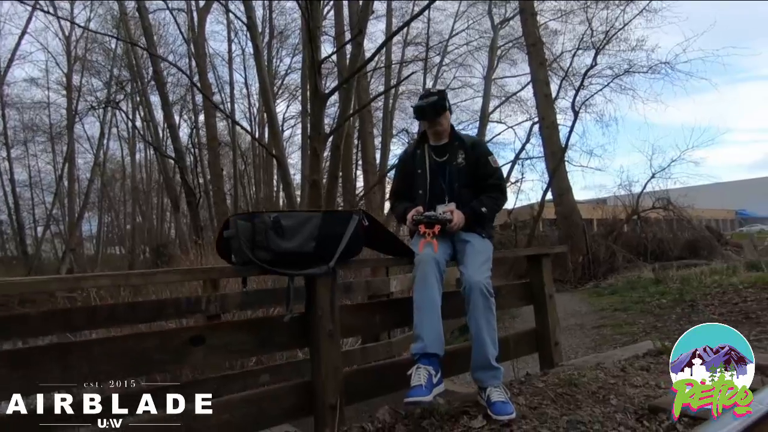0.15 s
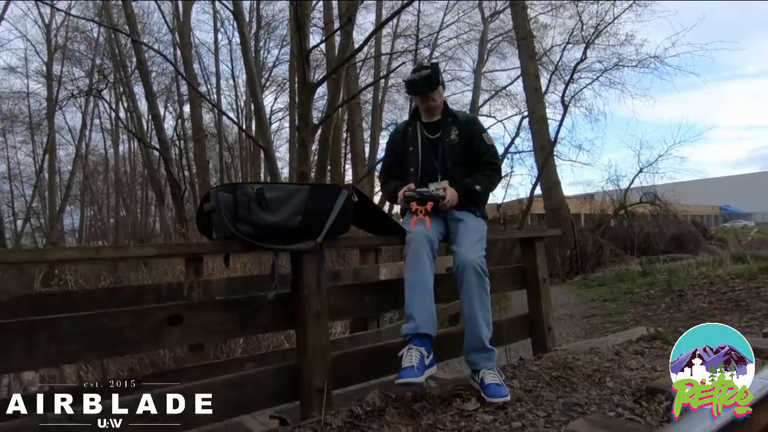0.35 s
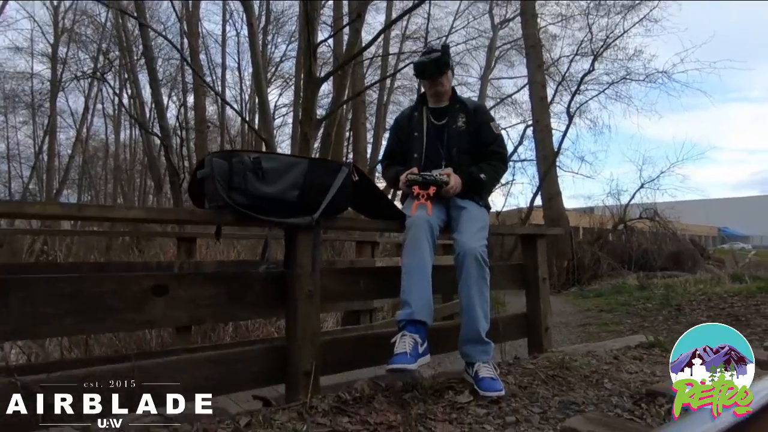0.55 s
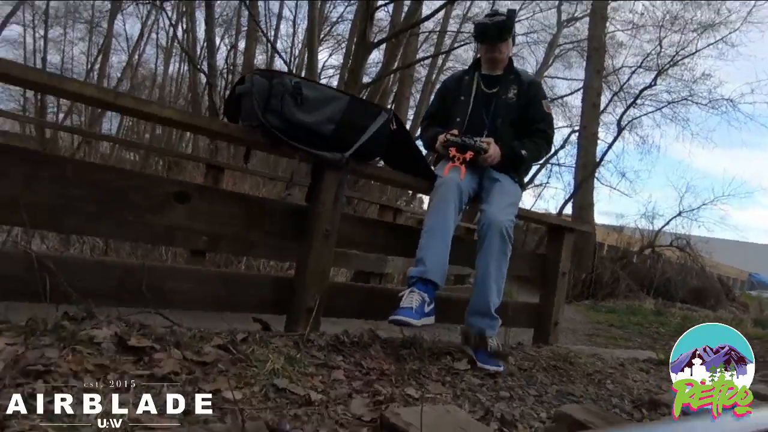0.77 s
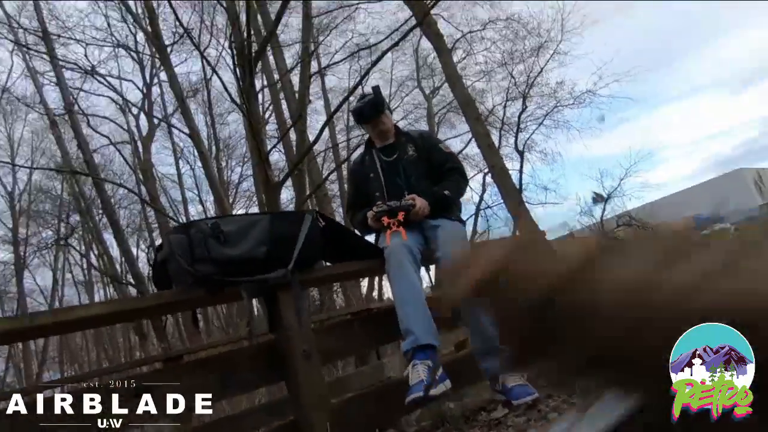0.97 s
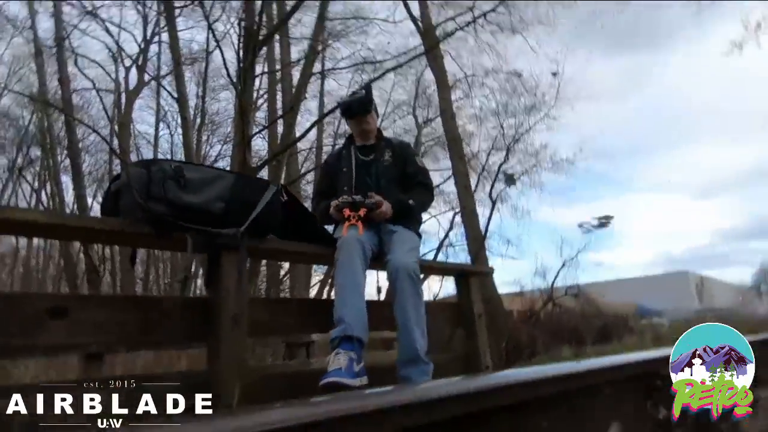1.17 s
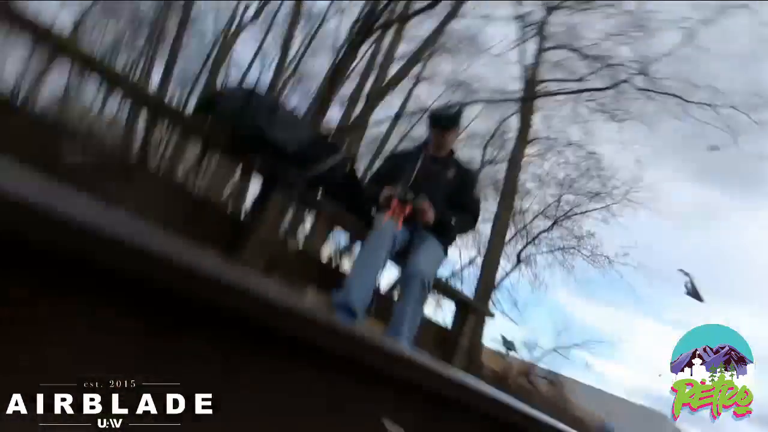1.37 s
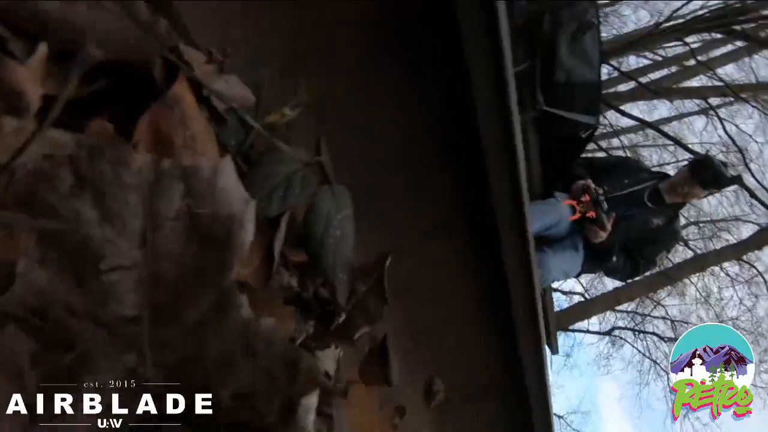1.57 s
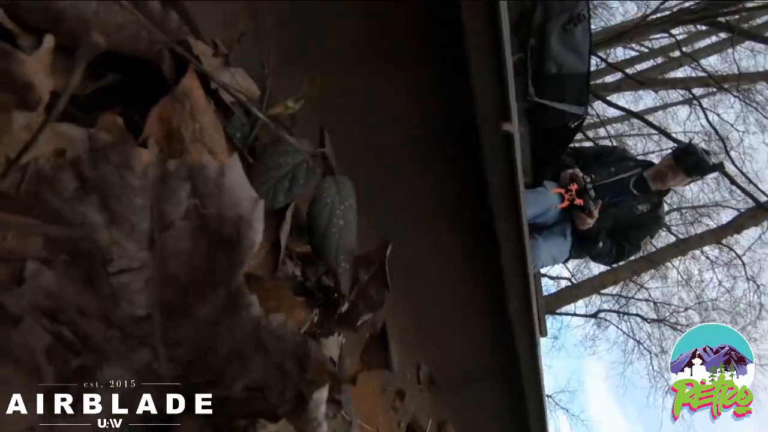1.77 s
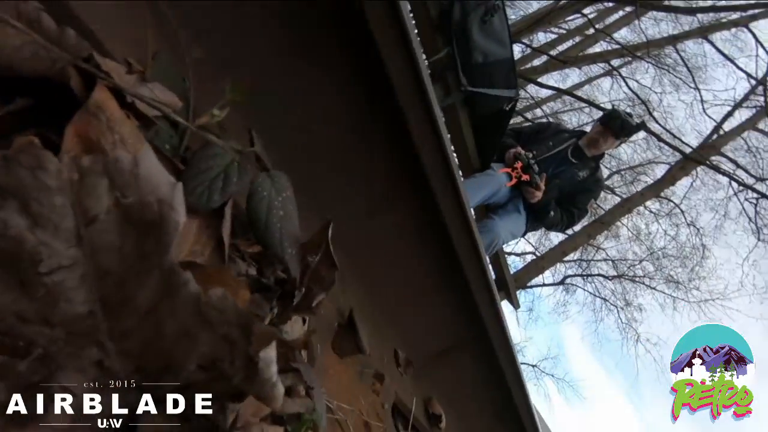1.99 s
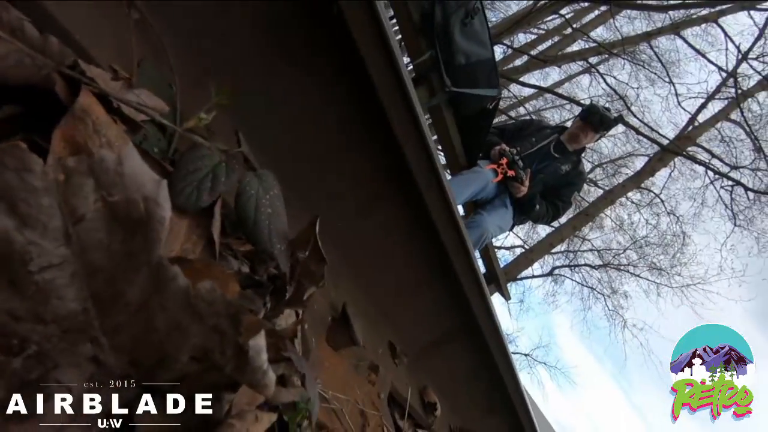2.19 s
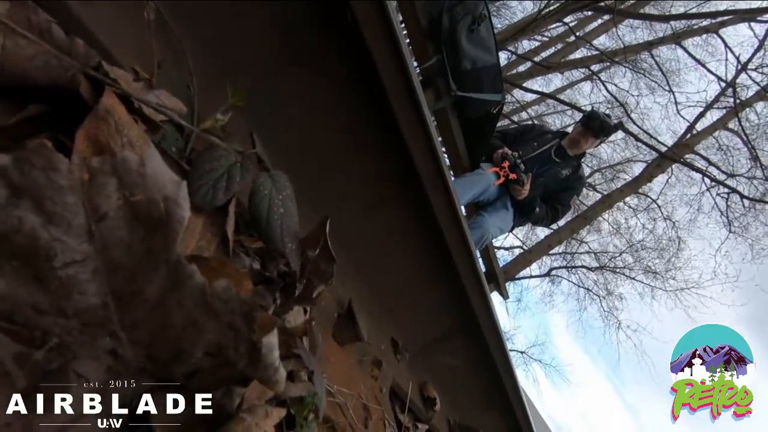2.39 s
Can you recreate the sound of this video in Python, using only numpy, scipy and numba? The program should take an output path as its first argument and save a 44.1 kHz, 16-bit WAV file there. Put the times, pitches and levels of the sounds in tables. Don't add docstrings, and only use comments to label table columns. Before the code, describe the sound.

A small drone's motors hum, wavering and beating slightly, with bright propeller hiss, from 0 to about 1.05 s, with a dull bump at 0.92. At 1.07 the propellers clip the ground: clack, leaf rustle, rumble, lurching pitch. Motors fall and stop by 1.35. A hard knock hits at 1.36, more clacks and crisp leaf crunches until 1.5, then sparse snaps fade; a soft knock near 2.12, almost silent to the end.

```python
import sys
import numpy as np
from scipy import signal
from scipy.fft import rfft, irfft
from scipy.io import wavfile
from scipy.ndimage import uniform_filter1d
from numba import njit

SR = 44100
rng = np.random.default_rng(int(sys.argv[2]) if len(sys.argv) > 2 else 0)


def unload_wav(signal):
    wavfile.write(
        sys.argv[1],
        SR,
        np.round(np.clip(np.atleast_2d(signal).T, -1, 1) * 32767).astype(np.int16),
    )


def invert_db(level):
    return 10 ** (np.asarray(level, dtype=float) / 20)


N = 107559
T = np.arange(N) / SR

# [t/s, level/dB]
RUMBLE_LEVEL = [(0, -49), (.8, -51.5), (1.05, -48), (1.12, -36.5), (1.3, -39), (1.5, -40.5), (1.56, -56),
                (1.72, -56), (2.15, -59), (2.2, -65.5), (2.3, -62), (2.41, -60)]
# [f/Hz, level/dB]
RUMBLE_SPECTRUM = [(20, -3), (90, -2), (190, 1.5), (320, -14.5), (480, -5.5), (900, -24), (2500, -37)]
# [t/s, level/dB]
CRUSH_LEVEL = [(1.05, -67.5), (1.07, -36), (1.1, -42.5), (1.24, -41.5), (1.29, -57.5), (1.335, -59),
               (1.35, -46), (1.368, -45), (1.38, -56.5), (1.415, -57.5), (1.43, -44.5), (1.444, -58.5),
               (1.454, -42), (1.475, -40.5), (1.497, -43), (1.508, -51), (1.525, -56.5), (1.56, -57.5),
               (1.61, -65.5), (1.64, -60.5), (1.72, -66), (1.76, -73), (1.84, -75), (1.89, -64),
               (1.95, -64.5), (1.97, -69.5), (2.15, -72.5), (2.18, -85), (2.44, -85)]
# [f/Hz, level/dB]
CRUSH_SPECTRUM = [(500, -24), (1000, -10.5), (2500, -1.5), (4450, -1.5), (6140, -1), (8000, -6.5),
                  (11000, -34.5), (15000, -45.5)]
# [low f/Hz, high f/Hz]
GRAIN_BANDS_HZ = [(400, 3200), (3200, 5000), (5000, 15000)]
# [t/s, peak level/dB, pitch f/Hz]
LEAF_SNAPS = [(1.4272, -30, 5170), (1.4305, -27, 3860), (1.4572, -25, 5680), (1.4703, -28, 5880),
              (1.4834, -21, 6100), (1.4924, -23, 6060), (1.4996, -23, 6200), (1.509, -33, 3400),
              (1.5154, -32, 5870), (1.5425, -43.5, 6560), (1.5844, -53, 6630), (1.5923, -37, 2900),
              (1.6287, -45, 2900), (1.647, -40, 6490), (1.6632, -37, 6550), (1.6742, -28.5, 6300),
              (1.699, -40, 5100), (1.721, -43, 5640), (1.785, -47, 5530), (1.792, -49, 5220),
              (1.8287, -59, 5480), (1.848, -54, 6370), (1.8786, -45.5, 4500), (1.8946, -47, 6330),
              (1.9084, -58, 5850), (1.945, -40, 5860), (1.9994, -50, 3540), (2.0203, -54, 4560),
              (2.0677, -41, 5500), (2.105, -53, 5700), (2.1241, -39, 5650), (2.148, -47, 6660),
              (2.184, -64.5, 2243), (2.2054, -60, 5760), (2.3094, -67.5, 3440), (2.3214, -68.5, 1570),
              (2.3745, -60.5, 5330), (2.404, -63, 6150), (2.421, -63.5, 1506)]
# [t/s, level/dB, body f/Hz, ring T30/s (30 dB fall), crack level/dB]
FRAME_KNOCKS = [(.922, -33, 60.03, 0.089, -35), (1.067, -41, 300, 0.026, -1), (1.092, -31, 172, 0.031, -14),
                (1.343, -80, 131, 0.034, -22.5), (1.356, -14.5, 182, 0.015, -30),
                (1.362, -21.5, 173, 0.029, -12), (1.37, -15, 106, 0.014, -26),
                (1.397, -33, 576, 0.041, -37), (1.423, -35, 315, 0.045, -11),
                (1.4295, -29.5, 473, 0.046, -10.5), (1.433, -39, 430, 0.051, -10),
                (1.471, -33, 216, 0.11, -43), (1.945, -51, 195, 0.09, -10), (2.068, -62, 145, .03, -11),
                (2.125, -41.5, 101, 0.015, -22)]
# [t/s, shaft f/Hz, shaft hum level/dB, blade tone level/dB]
MOTOR_1 = [(0, 361.9, -23.5, -54), (.12, 349.7, -25.5, -53), (.2, 361.2, -25, -52.5), (.3, 380.6, -30, -44),
           (.43, 390, -31.5, -43.5), (.54, 386.9, -28.5, -41), (.6, 372.5, -35, -55),
           (.71, 373.1, -41.5, -46.5), (.78, 356.2, -38, -48), (.87, 346.2, -31.5, -45),
           (.92, 354, -54, -48.5), (1, 377.6, -31.5, -43), (1.06, 405.2, -32.5, -48),
           (1.088, 392.8, -38.5, -54.5), (1.1, 345.3, -43.5, -50.5), (1.12, 372, -53.5, -38.5),
           (1.14, 363.6, -31, -56.5), (1.3, 150.6, -67.5, -86)]
MOTOR_2 = [(0, 396.1, -44, -39.5), (0.079, 401.9, -33, -43), (0.189, 396.2, -43, -41.5),
           (0.262, 377.5, -28, -53), (0.35, 372.9, -42.5, -46.5), (0.431, 362.2, -31.5, -55),
           (0.523, 364.1, -46, -54), (0.599, 374.2, -30.5, -45), (0.698, 387.7, -27.5, -50.5),
           (0.799, 399.3, -29.5, -47.5), (0.901, 415.3, -29, -49.5), (1, 397, -30, -52.5),
           (1.119, 372, -32, -50.5), (1.161, 377.6, -30, -58), (1.201, 469.6, -24, -62),
           (1.245, 361.6, -29.5, -54), (1.271, 304.5, -33, -66), (1.31, 168.4, -68.5, -87.5)]
MOTOR_3 = [(0, 419.5, -40, -44), (0.113, 436.8, -40, -42), (0.201, 428.6, -41, -41),
           (0.271, 418, -42, -43.5), (0.308, 408.7, -51, -47.5), (0.448, 406, -33.5, -45),
           (0.698, 392, -36.5, -57.5), (0.899, 397.8, -34, -51), (1.001, 368.5, -39, -52.5),
           (1.073, 340.3, -41.5, -44.5), (1.143, 354, -61.5, -46.5), (1.163, 292.5, -44.5, -59.5),
           (1.2, 231.3, -35.5, -70.5), (1.24, 169.4, -47, -60), (1.307, 155.4, -49.5, -95.5)]
# [t/s, shaft f/Hz, whine level/dB, blade tone level/dB]
MOTOR_4 = [(0, 384.9, -55.5, -53.5), (.24, 392.8, -47, -62.5), (.3, 420.1, -43, -68.5),
           (.55, 423.5, -40.5, -81), (.74, 422, -43, -85), (.9, 449.8, -39.5, -77.5),
           (1.0, 425.9, -37, -71), (1.11, 431.4, -38.5, -66.5), (1.15, 431.4, -55, -49),
           (1.176, 550.4, -50.5, -50), (1.198, 639, -55, -40.5), (1.22, 652.3, -50, -39.5),
           (1.242, 589.4, -51.5, -41), (1.268, 519, -63.5, -45), (1.282, 395, -60.5, -79.5),
           (1.296, 241.2, -72, -97.5), (1.316, 140, -71, -92.5), (1.345, 62, -79.5, -96.5)]
# [multiple of shaft rate, level/dB]
SHAFT_ORDERS = [(1, 0), (2, -25.5), (.5, -26.5), (1.5, -29.5)]
# [multiple of blade rate, level/dB]
BLADE_ORDERS = [(1, -0.5), (2, -13)]
# [multiple of magnet rate, level/dB]
COGGING_ORDERS = [(1, -10), (1.5, -4), (2, -5), (3, -1), (4, 7), (5, -3)]
OVERTONE_DB = [-11, -7, -15, -7]
# [t/s, level/dB]
WASH_LEVEL = [
    (0, -37),
    (.3, -34),
    (1.04, -34),
    (1.078, -31),
    (1.12, -33.5),
    (1.25, -33.5),
    (1.31, -41.5),
    (1.35, -42),
]
# [f/Hz, level/dB]
WASH_SPECTRUM = [(280, -9), (520, -4), (900, -21), (1750, -15.5), (2700, -1), (6300, -6), (9200, -22.5),
                 (12400, -47)]


def curve(table, column):
    table = np.array(table)
    return np.interp(T, table[:, 0], table[:, column])


def unit(x):
    return x / np.sqrt(np.mean(x ** 2))


def walk(rate_hz):
    hold = int(SR / rate_hz)
    steps = np.repeat(rng.standard_normal(N // hold + 1), hold)
    return 1.3 * uniform_filter1d(uniform_filter1d(steps, hold), hold)[:N]


def colour(x, spectrum):
    f_hz = np.maximum(np.arange(N // 2 + 1) * SR / N, 1)
    points_hz, points_db = np.array(spectrum).T
    gain_db = np.interp(np.log(f_hz), np.log(points_hz), points_db)
    return unit(irfft(rfft(x) * invert_db(gain_db), N))


@njit
def lowpass(x, hz):
    y, b, l = np.empty(len(x)), 0., 0.
    for i in range(len(x)):
        g = np.tan(np.pi * hz[i] / SR)
        v = (b + g * (x[i] - l)) / (1 + g * (g + 1.4))
        y[i] = l + g * v
        b, l = 2 * v - b, l + 2 * g * v
    return y


def bandpass(x, low_hz, high_hz, order):
    return signal.lfilter(*signal.butter(order, [low_hz, high_hz], "band", fs=SR), x)


def decay(t, t60_s):
    return np.exp(-np.log(1000) * t / t60_s)


def add(out, start_s, sound):
    i = int(start_s * SR)
    out[i:i + len(sound)] += sound[:N - i]


def rumble():
    level_db = curve(RUMBLE_LEVEL, 1)
    gusts = colour(rng.standard_normal(N) * invert_db(4.6 * walk(35)), RUMBLE_SPECTRUM)
    top_hz = 1070 * invert_db(0.49 * np.minimum(level_db + 45.5, 0))
    return lowpass(lowpass(gusts, top_hz), top_hz) * invert_db(level_db)


def leaf_crush():
    grains_per_s, settling, spread_db, patchy_db, bed = 730, .45, 0.5, 2.5, .45
    level_db = curve(CRUSH_LEVEL, 1)
    rate = grains_per_s * invert_db(settling * (level_db + 43)) / SR
    grains = 0
    for low_hz, high_hz in GRAIN_BANDS_HZ:
        ticks = (rng.random(N) < rate) * rng.standard_normal(N)
        ticks = ticks * invert_db(spread_db * np.minimum(rng.exponential(size=N), 3))
        ticks = ticks / np.sqrt(rate + 0.0024) / 2 + bed * rng.standard_normal(N)
        grains = grains + bandpass(ticks * invert_db(patchy_db * walk(70)), low_hz, high_hz, 2)
    return colour(grains, CRUSH_SPECTRUM) * invert_db(level_db)


def leaf_snaps():
    t60_s, rise_s, tick_s, tick_db, top_hz = 0.027, 0.0017, 0.003, -2.5, 8580
    out, t = np.zeros(N), T[:1500]
    tick_filter = signal.butter(1, 1200, "high", fs=SR)
    top_filter = signal.butter(6, top_hz, fs=SR)
    for start_s, peak_db, pitch_hz in LEAF_SNAPS:
        burst = rng.standard_normal(len(t)) * decay(t, t60_s) * (1 - np.exp(-t / rise_s))
        ring = bandpass(burst, pitch_hz * 0.79, pitch_hz * 1.204, 2)
        tick = signal.lfilter(*tick_filter, burst * np.exp(-t / tick_s))
        snap = signal.lfilter(*top_filter, ring + invert_db(tick_db) * tick)
        add(out, start_s, invert_db(peak_db - 5.5) * snap / np.max(np.abs(snap)))
    return out


def knocks():
    push_s, crack_t60_s, crack_hz = 0.001, 0.015, 2520
    shell_hz, shell_db = 658, -13
    out, t = np.zeros(N), T[:6000]
    shell = invert_db(shell_db) * np.sin(2 * np.pi * shell_hz * t) * decay(t, 2 * crack_t60_s)
    for start_s, level_db, body_hz, ring_s, crack_db in FRAME_KNOCKS:
        body = -np.sin(2 * np.pi * body_hz * t) * decay(t, 2 * ring_s) * (1 - np.exp(-t / push_s))
        crack = rng.standard_normal(len(t)) * decay(t, crack_t60_s)
        crack = bandpass(crack, crack_hz / 8, crack_hz * 0.81, 1)
        add(out, start_s, invert_db(level_db) * (body + invert_db(crack_db + 15.5) * (crack + shell)))
    return out


def partials(orders, base, turns, flutter, depth_db):
    total = 0
    for multiple, level_db in orders:
        gain = invert_db(level_db + depth_db * np.roll(flutter, rng.integers(N)))
        total = total + gain * np.sin(multiple * base * turns + 6 * rng.random())
    return total


def motor(table, whine=False):
    blades, magnet_pairs = 3, 7
    speed_jitter, tone_flutter_db, overtone_flutter_db = .003, 1.2, 3
    flutter = walk(39.954)
    rough = 1 + 2 * (T > 1.08)
    wobble = speed_jitter * rough * (2.2 if whine else 1) * walk(59.2)
    turns = 2 * np.pi * np.cumsum(curve(table, 1) * (1 + wobble)) / SR
    blade_db = curve(table, 3)

    if whine:
        hum = partials([(1, 0.0097)], magnet_pairs, turns, flutter, overtone_flutter_db)
    else:
        hum = partials(SHAFT_ORDERS, 0.99, turns, flutter, tone_flutter_db * rough)
    blade_flutter_db = tone_flutter_db * (2 if whine else 1 + rough)
    blade_tone = partials(BLADE_ORDERS, blades, turns, flutter, blade_flutter_db)
    tone = invert_db(curve(table, 2)) * hum + invert_db(blade_db) * blade_tone

    orders = [(k, -10 * (k > 12)) for k in range(9, 25, blades)]
    overtones = partials(orders, 1, turns, flutter, overtone_flutter_db)
    overtones = overtones * invert_db(.35 * (blade_db + 46))

    cogging = 0
    if whine:
        cogging = partials(COGGING_ORDERS, magnet_pairs, turns, walk(150), overtone_flutter_db * 2)
    return np.sqrt(2) * tone, overtones, cogging, blades * turns


def frame_shake(rattle, coast):
    frame_hz, frame_q, level_db, stall_db, near_ground_s = 462, 7, -46.5, 4, .82
    shake = signal.lfilter(*signal.iirpeak(frame_hz, frame_q, fs=SR), rng.standard_normal(N))
    fade_in = np.clip((T - near_ground_s) * 10, 0, 1)
    return invert_db(level_db + stall_db * rattle) * unit(shake) * fade_in * (1 - np.maximum(coast, 0))


def props():
    cut_s, coast_s, stop_s = 1.28, .065, 1.35
    top_start_hz, top_end_hz = 14000, 2400
    chop_depth, flicker_db, coast_hiss_db, coast_rattle_db = 0.24, 1.87, -4, -2
    coast = np.clip((T - cut_s) / coast_s, -.3, 1)
    rattle = np.clip(2 * coast + .6, 0, 1)
    cogging_gain = invert_db(coast_rattle_db) * rattle * (1 - np.maximum(coast, 0) ** 2)
    tones, hiss = 0, 0
    for k, table in enumerate([MOTOR_1, MOTOR_2, MOTOR_3, MOTOR_4]):
        tone, overtones, cogging, blade_phase = motor(table, whine=k == 3)
        tones = tones + tone
        chopped = rng.standard_normal(N) * (1 + chop_depth * np.cos(blade_phase))
        hiss = hiss + chopped * invert_db(flicker_db * walk(50.01) + coast_hiss_db * rattle)
        hiss = hiss + overtones * invert_db(OVERTONE_DB[k]) + cogging * cogging_gain

    hiss = colour(hiss, WASH_SPECTRUM)
    top_hz = np.clip(top_start_hz * (top_end_hz / top_start_hz) ** coast, 200, .45 * SR)
    for _ in range(3):
        hiss = lowpass(hiss, top_hz)
    mix = tones + frame_shake(rattle, coast) + hiss * invert_db(curve(WASH_LEVEL, 1))
    return mix * np.clip((stop_s - T) * 100, 0, 1)


def scene():
    case = signal.butter(4, 7350, fs=SR)
    muffled_knocks = signal.lfilter(*case, knocks())
    return (rumble() + leaf_crush() + leaf_snaps() + muffled_knocks + props())[None]


def roll_off(x):
    return signal.sosfilt(signal.butter(12, 15100, fs=SR, output="sos"), x)


def record(dry):
    return roll_off(dry)


dry = scene()
out = record(dry)
unload_wav(out)
```